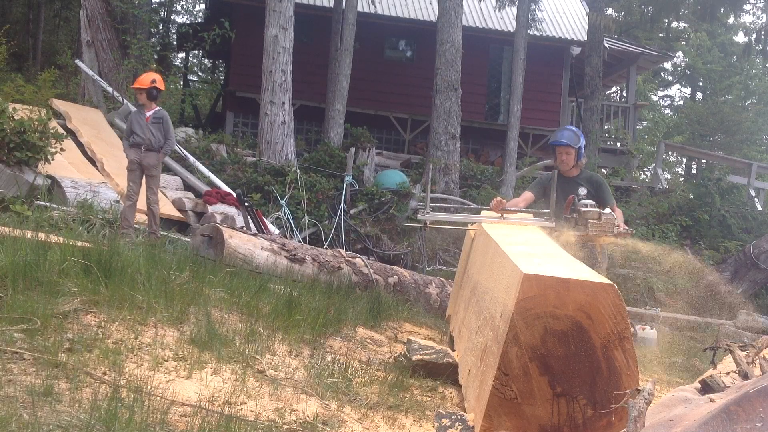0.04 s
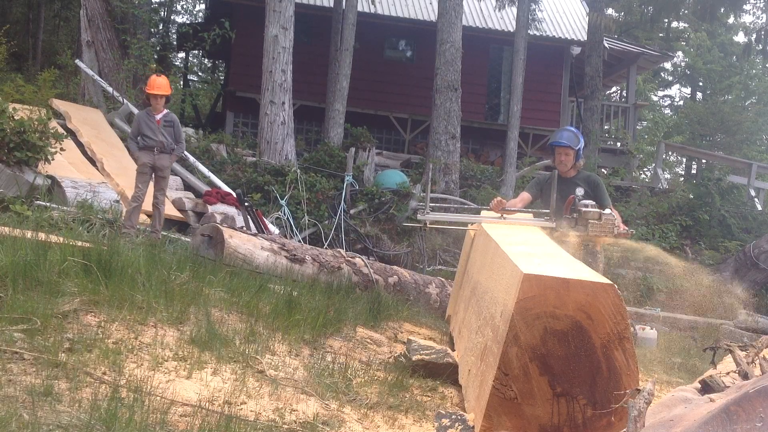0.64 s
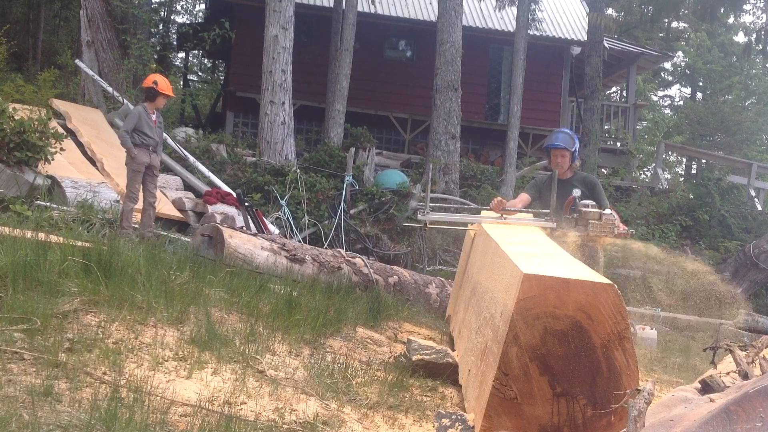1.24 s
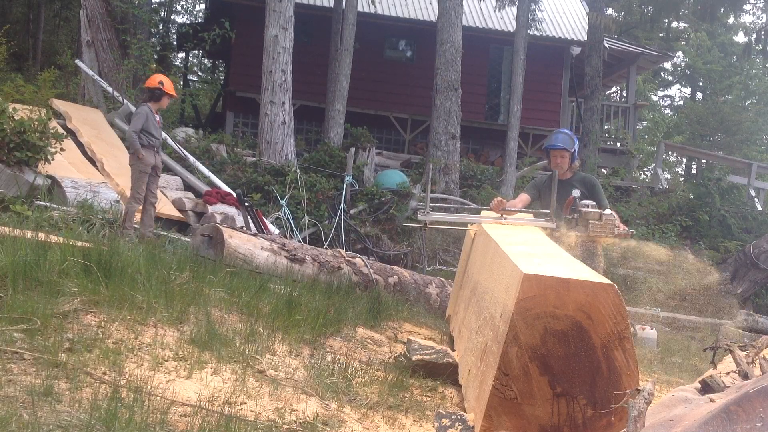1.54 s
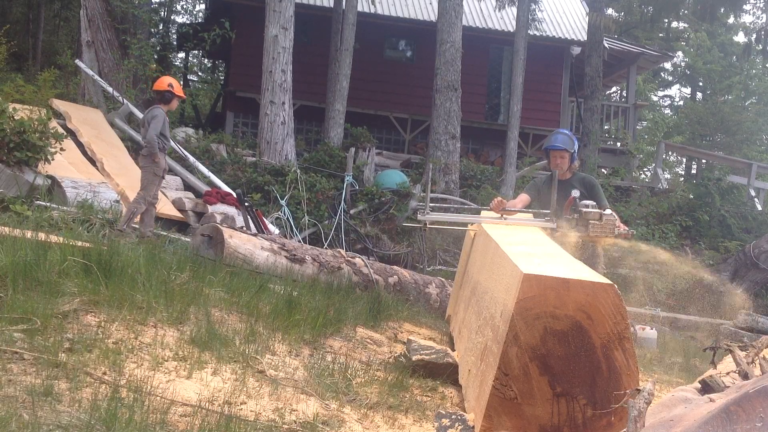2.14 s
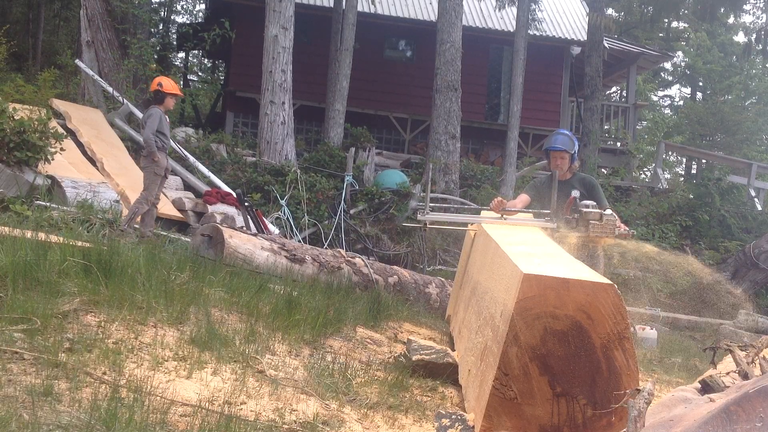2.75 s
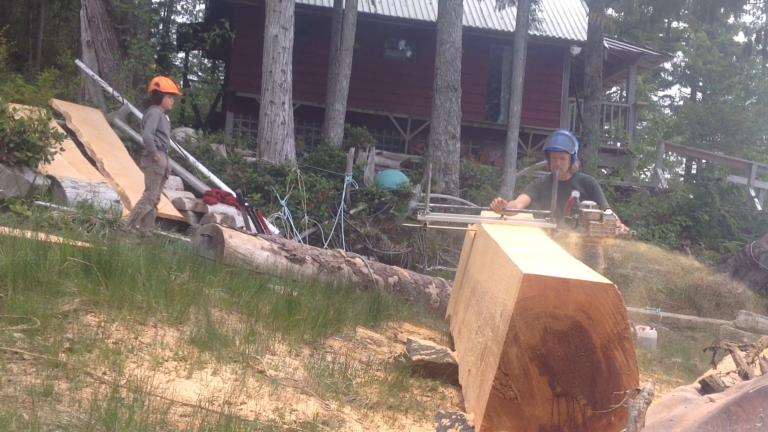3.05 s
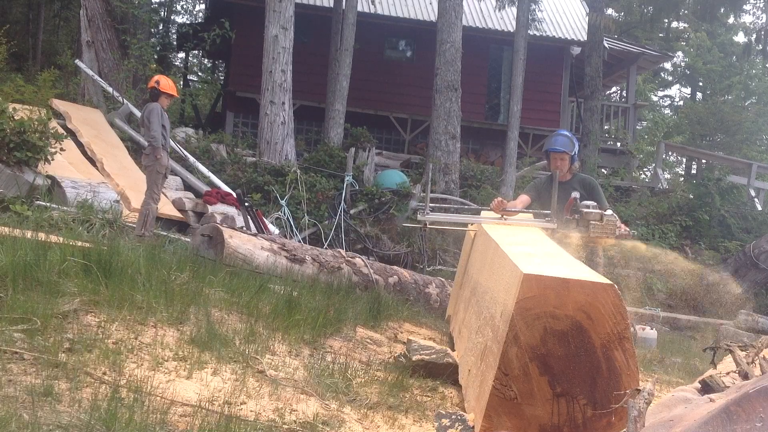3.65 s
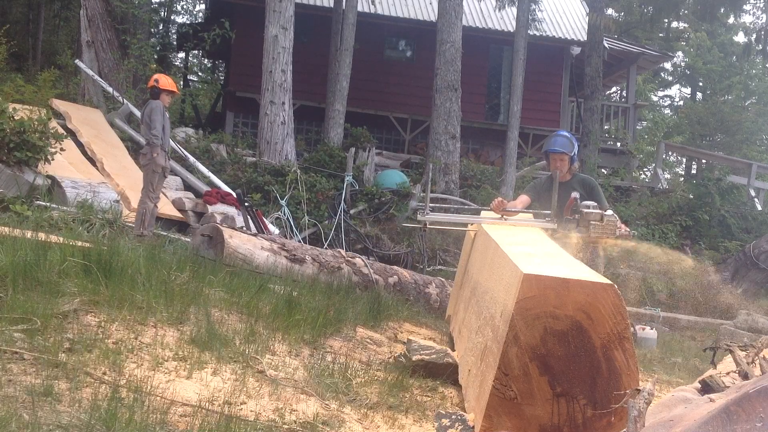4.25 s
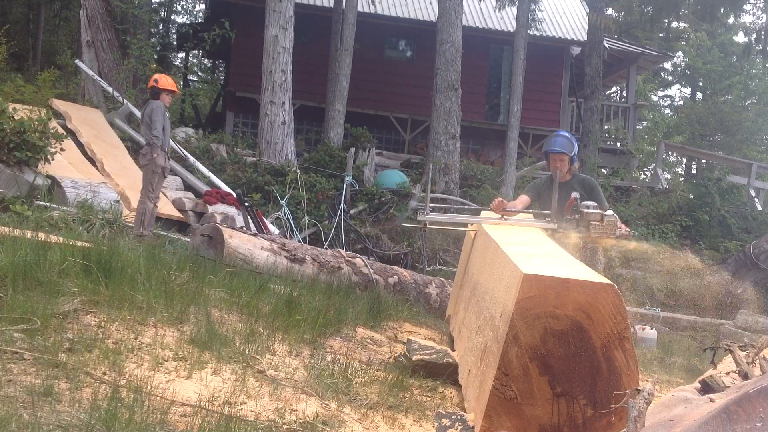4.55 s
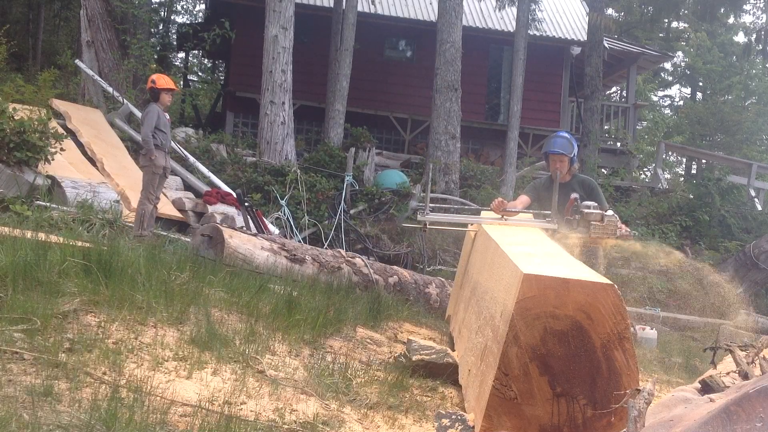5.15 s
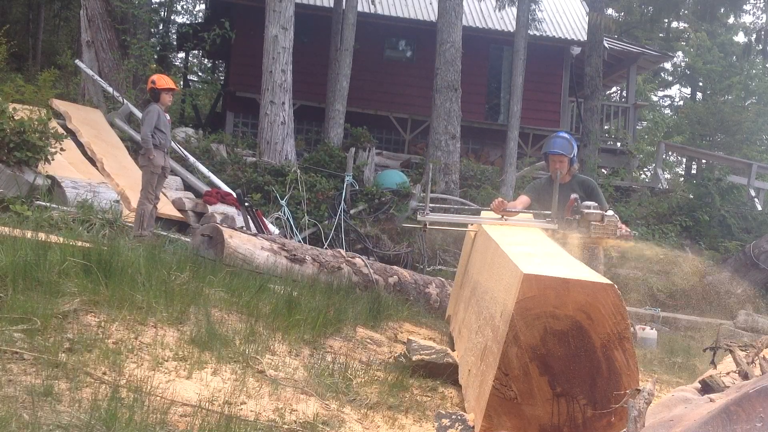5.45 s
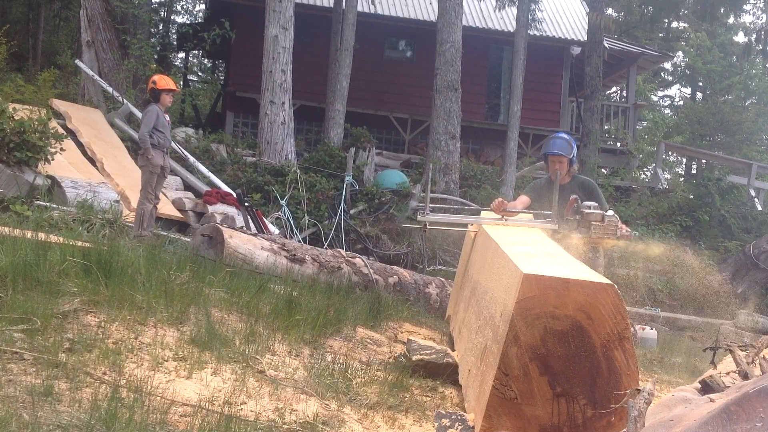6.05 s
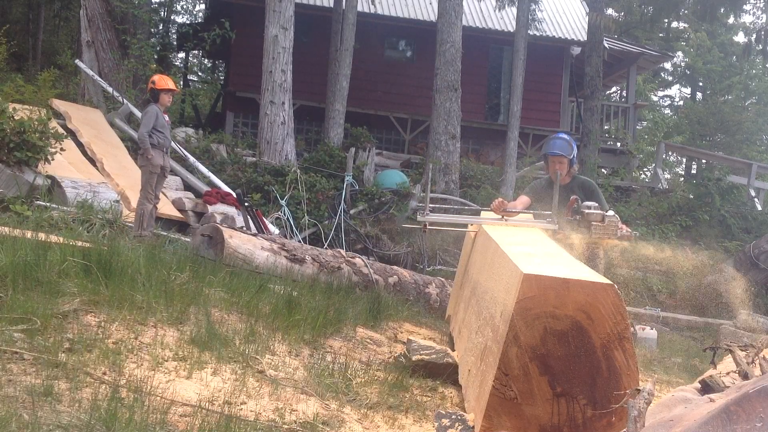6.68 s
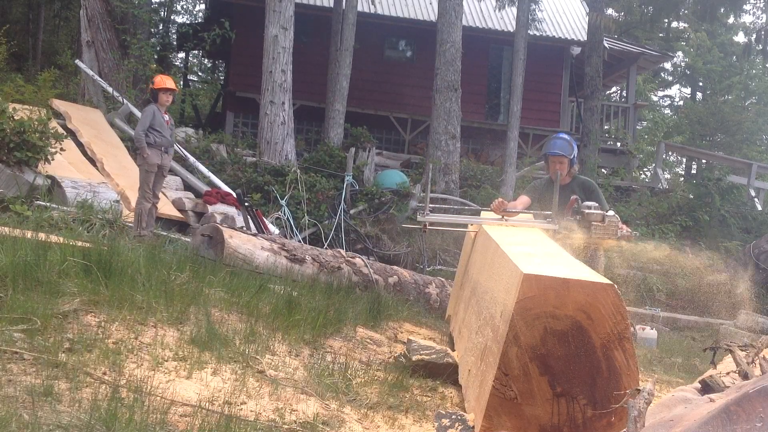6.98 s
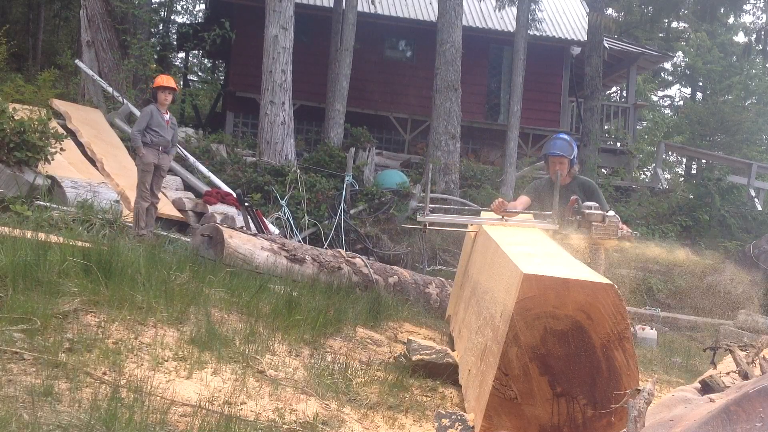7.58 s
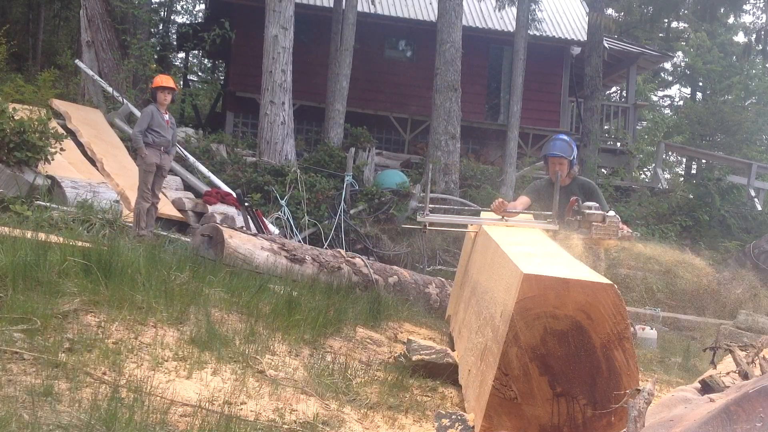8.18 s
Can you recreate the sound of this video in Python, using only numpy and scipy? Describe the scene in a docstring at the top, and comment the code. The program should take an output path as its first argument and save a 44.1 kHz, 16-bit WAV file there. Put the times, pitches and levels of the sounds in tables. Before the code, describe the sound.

A big two-stroke chainsaw rips steadily through a log outdoors, its loud, barking engine dipping slightly in pitch under load.

```python
"""Among trees near a cabin, a few metres away, a big two-stroke chainsaw in a milling frame rips a log.
Each firing of the engine barks through the muffler, and the sharp ones make its sheet metal ring.
The engine slows as the chain bites, and the cutters rasp underneath as they tear out chips.
Trunks and the cabin wall echo the saw while the breeze rumbles softly.
The peak of nearly every bark overloads the microphone and crackles."""
import sys
import numpy as np
from scipy import signal
from scipy.fft import rfft, irfft
from scipy.io import wavfile
from scipy.ndimage import uniform_filter1d, minimum_filter1d

SR = 44100
rng = np.random.default_rng(int(sys.argv[2]) if len(sys.argv) > 2 else 0)


def transcribe(signal):
    """Save signal, clipped to [-1, 1], as a 16-bit WAV file at the path in sys.argv[1]."""
    frames = np.atleast_2d(signal).T
    limited = np.clip(frames, -1, 1)
    pcm = np.round(limited * 32767).astype(np.int16)
    wavfile.write(sys.argv[1], SR, pcm)


N = 366912


def undb(db):
    """Turn decibels into a number to multiply by."""
    return 10 ** (np.asarray(db) / 20)


def level(x, db):
    """Set a sound's average (rms) level."""
    return x * undb(db) / np.sqrt(np.mean(x ** 2))


def curve(table):
    """Join (time, value) points with straight lines, one value per sample."""
    return np.interp(np.arange(N) / SR, *np.transpose(table))


def drift(per_s):
    """A smooth random wobble, about 1 in size."""
    hold = max(int(SR / per_s), 1)
    steps = np.repeat(rng.standard_normal(N // hold + 1), hold)
    return level(uniform_filter1d(uniform_filter1d(steps, hold), hold)[:N], 0)


def dull(x, hz, order=1):
    """Soften the treble above hz."""
    return signal.lfilter(*signal.butter(order, hz, fs=SR), x)


def colour(x, tone, size=4096):
    """Shape a sound with a tone table; the filter rings after a pulse, never before."""
    hz, db = np.transpose(tone)
    grid_hz = np.maximum(np.arange(size // 2 + 1) * SR / size, 1)
    gains = undb(np.interp(np.log(grid_hz), np.log(hz), db))
    cepstrum = irfft(np.log(gains))
    cepstrum[1:size // 2] *= 2
    cepstrum[size // 2 + 1:] = 0
    ringing = irfft(np.exp(rfft(cepstrum)))
    return signal.fftconvolve(x, ringing)[:N]


def resonate(x, hz, width_hz, db):
    """Lift or cut one narrow band of pitches."""
    band = signal.lfilter(*signal.iirpeak(hz, hz / width_hz, fs=SR), x)
    return x + (undb(db) - 1) * band


def pulses(at, sizes):
    """Clicks at the sample positions `at`, each shared between two neighbouring samples."""
    at = np.clip(at, 0, N - 2)
    whole, part = at.astype(int), at % 1
    return np.bincount(whole, sizes * (1 - part), N) + np.bincount(whole + 1, sizes * part, N)


def puffs(at, sizes, decay_s):
    """A quickly fading burst of hiss at each position."""
    fades = signal.lfilter([1], [1, -np.exp(-1 / (decay_s * SR))], pulses(at, sizes))
    return fades * rng.standard_normal(N)


# moments when the engine stumbles: (time [s], half length [s], level change [dB])
STUMBLES = [(0.135, 0.024, -1.5), (0.545, 0.021, -2.5), (0.919, 0.034, -1.38), (1.53, .015, -3),
            (2.937, .025, -1), (3.627, 0.035, -1.5), (3.815, 0.056, -1.5), (5.163, .035, -2.5),
            (5.264, .025, -3), (7.309, 0.016, -2)]

def stumble_db(at):
    """A few firings burn weakly: their drop in level at these sample positions."""
    return sum(db * np.exp(-((at / SR - s) / half_s) ** 2) for s, half_s, db in STUMBLES)


# engine speed before stumbles, sagging as the saw is pushed into the wood: (time [s], firing rate [Hz])
ENGINE_SPEED = [(0.0, 88.25), (0.34, 82.15), (0.5, 80.74), (0.8, 87.4), (0.92, 86.4), (1.19, 87.76),
                (1.26, 90.1), (1.7, 92.6), (2.2, 88.82), (3.06, 85.85), (3.31, 87.55), (3.68, 85.49),
                (4.27, 87.9), (5.12, 86.94), (5.21, 85.73), (5.45, 87.5), (5.9, 84.95), (6.85, 82.2),
                (6.96, 84.2), (7.61, 85.84), (7.81, 84.5), (8.02, 85.4), (8.25, 83.6)]

def engine_speed(stumble_hz_per_db=0.5, flywheel_lag_s=.03):
    """Firings per second; a stumble slows the heavy flywheel a moment later."""
    return curve(ENGINE_SPEED) + stumble_hz_per_db * stumble_db(np.arange(N) - flywheel_lag_s * SR)


def firings(hz, jitter_s=.000025, wander=.0033, scatter_db=0.46):
    """Position and strength of one firing per engine turn; no two burn alike."""
    turns = np.cumsum(hz * (1 + wander * drift(30))) / SR
    at = np.interp(np.arange(int(turns[-1]) + 1), turns, np.arange(N))
    late, burn = rng.standard_normal((len(at), 2)).T
    return at + jitter_s * SR * late, undb(scatter_db * burn)


def sharpness(at, drop_db, scatter_db=10, cluster_db=4.0, dulling=4.7):
    """How sharp each firing is: it varies, comes in bursts, and fails with a weak burn."""
    alone_db = scatter_db * rng.uniform(-1.3, 1, len(at))
    burst_db = cluster_db * np.tanh(drift(24))[at.astype(int).clip(0, N - 1)]
    return undb(alone_db + burst_db + dulling * drop_db)


# tone of one exhaust bark: (frequency [Hz], level [dB])
BARK_TONE = [(40, -36.5), (87, -21.5), (175, -17.5), (265, -9.5), (420, -3), (520, 0), (680, 0.5), (800, 1),
             (950, -8.5), (1450, -20), (1650, -34.5), (2600, -47.5), (4200, -63.5), (12000, -88.5)]
# the muffler box booms, cancels just above that, and rings: (frequency [Hz], width [Hz], boost [dB])
MUFFLER_BOX = [(354.7, 59, 6.5), (435.4, 20, -10), (818.6, 49, 4.5)]
# drones as the firing rate or its double passes through: (frequency [Hz], width [Hz], boost [dB])
LOW_DRONES = [(92.4, 5.2, 4.5), (168, 19, 6)]

def exhaust(at, strength, gas_db=-21):
    """Each firing sends a pressure pulse and a puff of swirling gas through the muffler."""
    pressure = pulses(at, strength)
    swing = pressure - 2 * dull(pressure, hz=154)  # the lows come late, so each pulse rebounds
    bark = colour(swing, BARK_TONE)
    for resonance in MUFFLER_BOX + LOW_DRONES:
        bark = resonate(bark, *resonance)
    gas = colour(puffs(at, strength, decay_s=0.0008), BARK_TONE)
    return level(close_bounces(bark), 0) + level(gas, gas_db)


# bounces off the log, ground and trunks; minus flips the wave: (delay [s], share of pressure [ratio])
BOUNCES = [(.0048, -0.017), (.00707, -0.18), (.00826, 0.014), (0.0319, -0.14)]

def close_bounces(x, dull_hz=1100):
    """The direct sound plus duller copies from surfaces close by."""
    dulled, samples = dull(x, dull_hz), np.arange(N)
    return x + sum(share * np.interp(samples - s * SR, samples, dulled, left=0) for s, share in BOUNCES)


# tone of the overload clicks at a bark's tip: (frequency [Hz], level [dB])
CLICK_TONE = [(900, -20), (2000, 2.5), (3000, -2), (4300, -14.5), (5600, -8), (9000, -23), (15000, -29)]
# tone of the muffler's ringing sheet metal: (frequency [Hz], level [dB])
METAL_TONE = [(500, -27), (1300, -14.5), (1900, 0.5), (2200, -2), (2550, -3.5), (2900, -7), (3500, -16),
              (4500, -31.5), (12000, -59)]
# the metal's clearest ring: (frequency [Hz], width [Hz], boost [dB])
METAL_RING = (2570, 240, 2.9)

def overload_crackle_and_ring(at, edge, tip_s=0.000837, max_gap_s=.0005, ring_limit_db=9):
    """Each sharp bark overloads the recorder with two quick clicks, bright or blunt,
    and rings the muffler's metal."""
    tip = at + tip_s * SR
    gap, brightness = rng.random((len(at), 2)).T
    tip_end = tip + max_gap_s * SR * gap
    twice = lambda sizes: pulses(tip, sizes) + pulses(tip_end, sizes)
    blunt = dull(twice(edge * (1 - brightness)), hz=3000, order=2)
    clicks = colour(twice(edge * brightness) + blunt, CLICK_TONE)
    shake = puffs(tip, np.tanh(edge / undb(ring_limit_db)), decay_s=0.0017)
    ring = resonate(colour(shake, METAL_TONE), *METAL_RING)
    return level(clicks, db=-45.5) + level(ring, db=-42)


# tone of the chain tearing through wood: (frequency [Hz], level [dB])
RASP_TONE = [(50, -11.5), (120, -6.5), (300, -3.5), (520, -1.5), (780, 1), (1000, -1), (1400, -9),
             (1800, -30.5), (2500, -30.5), (4200, -49), (8000, -55), (15000, -61.5)]

def chain_rasp(hz, cutters_per_turn=3.5, scatter_db=2):
    """Cutters hit the wood in step with the engine, each tearing out a chip of its own size."""
    passed = np.cumsum(hz) * cutters_per_turn / SR
    count = int(passed[-1])
    at = np.interp(np.arange(count) + rng.random(count), passed, np.arange(N))
    sizes = undb(scatter_db * rng.standard_normal(count))
    chips = puffs(at, sizes, decay_s=0.0032)
    return level(colour(chips, RASP_TONE), db=-26)


# tone of the rumbling air: (frequency [Hz], level [dB])
BREEZE_TONE = [(10, -4), (28, 3.5), (60, -2), (130, -10), (300, -10), (1000, -65)]
# its slow swells, before gusts are added: (time [s], level [dB])
BREEZE_SWELLS = [(0, -50), (.6, -44.5), (2.8, -43.5), (3.3, -55), (4.1, -44.5), (5.3, -53.5), (6.75, -42.5),
                 (8.32, -45)]

def breeze(gusts_per_s=7, gust_db=1.0):
    """Moving air makes a soft rumble that swells and flutters."""
    rumble = level(colour(rng.standard_normal(N), BREEZE_TONE), 0)
    return rumble * undb(curve(BREEZE_SWELLS) + gust_db * drift(gusts_per_s))


def tree_echo(x, fade_s=0.61, first_s=0.058, dull_hz=1200, echo_db=-21):
    """Trunks and the cabin scatter back dull echoes that fall 60 dB in fade_s."""
    t = np.arange(SR) / SR
    tail = rng.standard_normal(SR) * undb(-60 * t / fade_s) * (t > first_s)
    echo = dull(signal.fftconvolve(x, tail)[:N], dull_hz)
    return level(echo, echo_db) * np.std(x)


def scene(cruise_hz=86.7, bite_db_per_hz=0.26, blunting_db_per_hz=0.33):
    """The saw, its echo and the breeze; as the engine slows, the cut grows and the crackle softens."""
    hz = engine_speed()
    sag_hz = cruise_hz - hz
    at, strength = firings(hz)
    drop_db = stumble_db(at)
    edge = strength * sharpness(at, drop_db)
    bark_sizes = strength * undb(drop_db) * edge ** .045  # sharper firings are a little louder
    barks = exhaust(at, bark_sizes) * undb(-13)
    crackle = overload_crackle_and_ring(at, edge) * undb(-blunting_db_per_hz * sag_hz)
    cut = chain_rasp(hz) * undb(bite_db_per_hz * sag_hz)
    saw = barks + crackle + cut
    return (saw + tree_echo(saw) + breeze())[None]


def auto_volume(x, peak_db=-0.9):
    """Turn the volume slowly up or down to keep the tallest peaks near one height."""
    tallest = -minimum_filter1d(-np.abs(x), size=1500)
    return x * undb(peak_db) / uniform_filter1d(tallest, size=12000)


def record(dry, knee=1.71, hardness=3.9, ceiling=.708, top_hz=15000):
    """The recorder evens out the barks, rounds and flattens their tips, and cuts the top treble."""
    held = auto_volume(dry)
    rounded = held / (1 + np.abs(held / knee) ** hardness) ** (1 / hardness)
    clipped = np.clip(rounded, -ceiling, ceiling)
    return signal.sosfilt(signal.ellip(8, .1, 80, top_hz, fs=SR, output="sos"), clipped)


dry = scene()
out = record(dry)
transcribe(out)
```